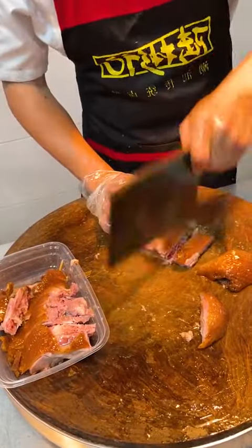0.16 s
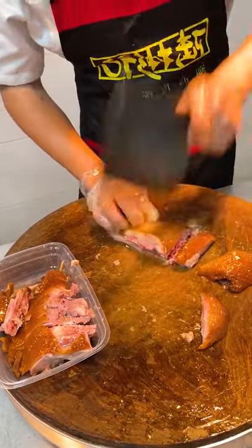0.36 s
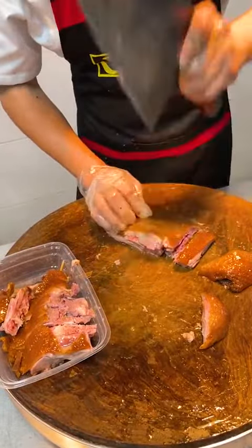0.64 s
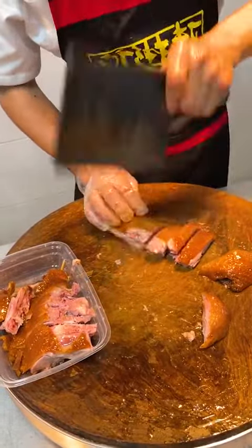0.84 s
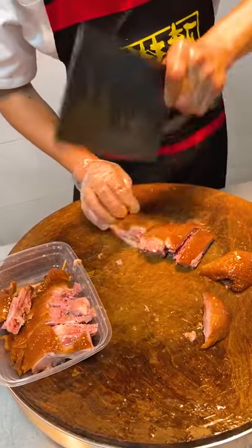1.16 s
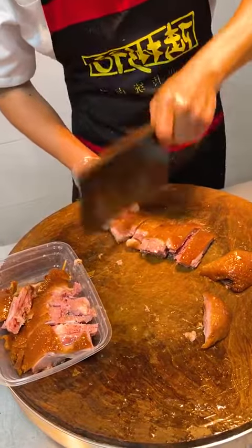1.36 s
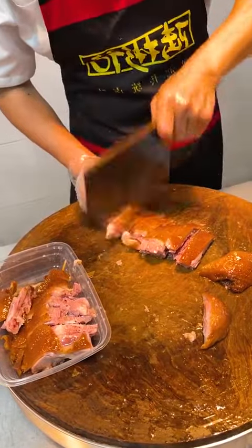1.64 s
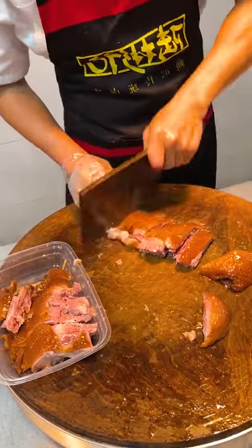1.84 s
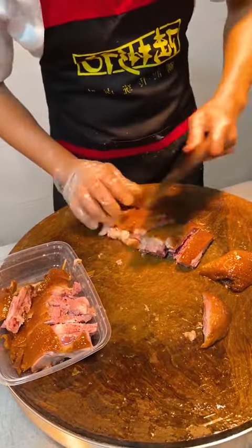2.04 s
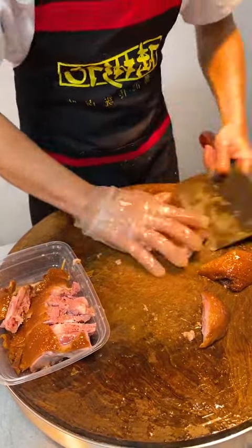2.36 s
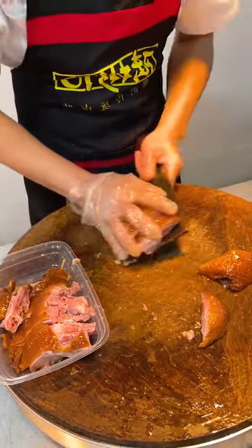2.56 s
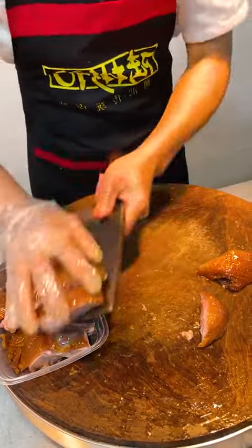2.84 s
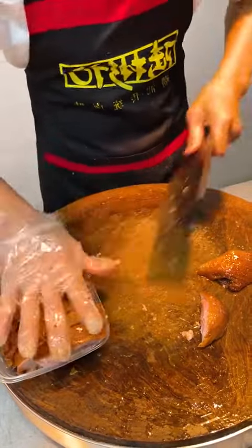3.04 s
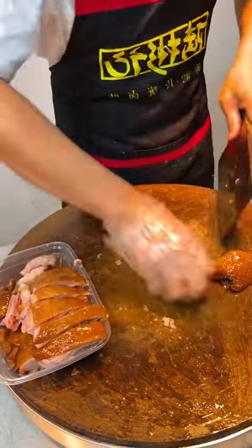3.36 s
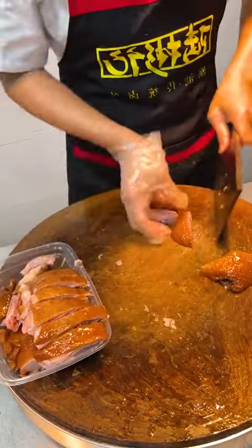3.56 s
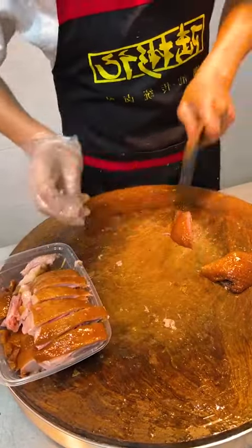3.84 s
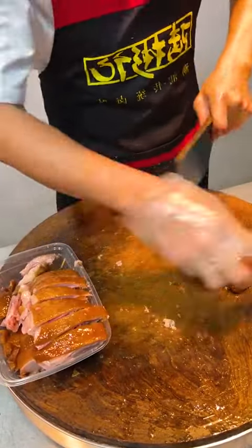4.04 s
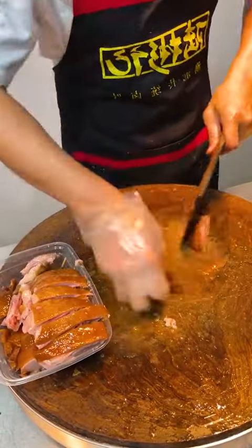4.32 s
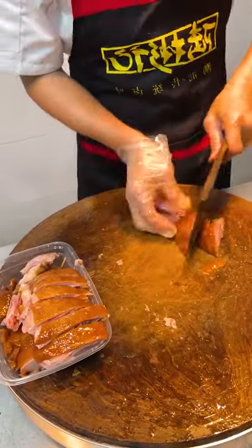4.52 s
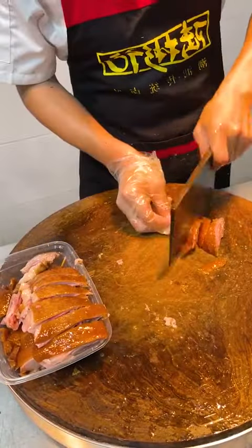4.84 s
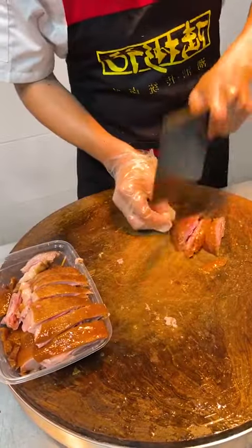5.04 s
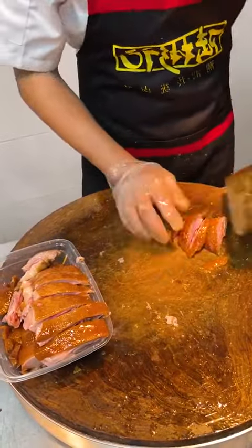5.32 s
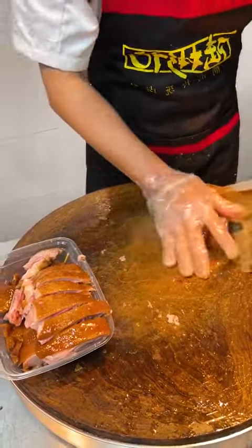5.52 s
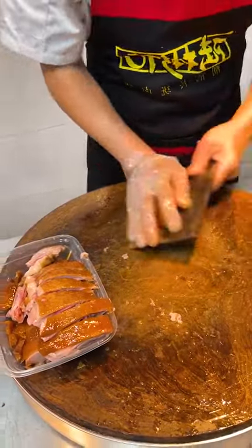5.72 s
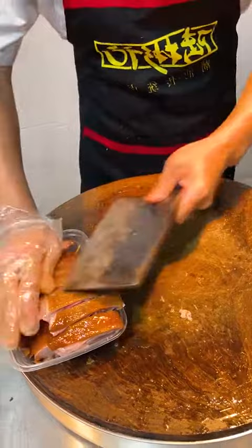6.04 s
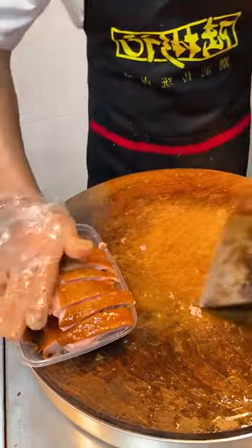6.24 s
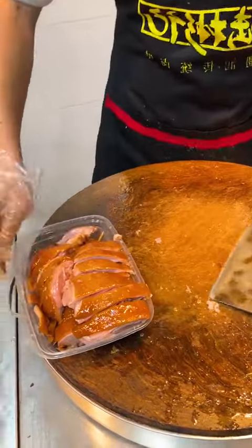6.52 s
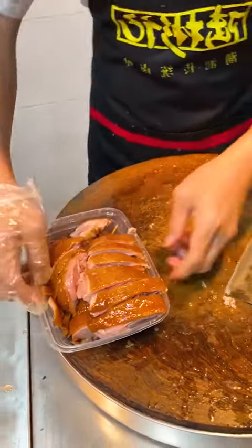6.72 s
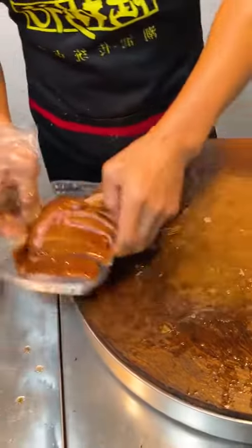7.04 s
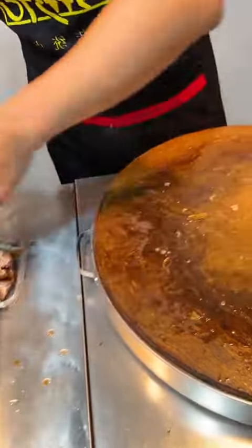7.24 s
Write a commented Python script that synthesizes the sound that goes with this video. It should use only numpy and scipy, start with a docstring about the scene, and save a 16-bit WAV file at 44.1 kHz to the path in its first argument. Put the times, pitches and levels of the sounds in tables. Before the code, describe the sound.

A heavy cleaver cracks through crisp roast meat on a thick wooden block in a small hard-walled shop, then blade, handle and plastic tub clatter lightly.

```python
"""In a small, hard-walled shop a heavy cleaver chops roast meat on a thick wooden block.
Each chop is a burst of crackling noise (skin and bone), then damped modes of block and table.
Filtered noise and steel modes make the blade scoop and lie down; a plastic glove rustles, a plastic tub is lifted.
A diffuse room rings after the blows over a steady rush of ventilation; a limiter ducks and lets the room swell back."""
import sys
import numpy as np
from scipy import signal
from scipy.fft import rfft, irfft, next_fast_len
from scipy.io import wavfile
from scipy.ndimage import uniform_filter1d, minimum_filter1d, map_coordinates

SR = 44100
rng = np.random.default_rng(int(sys.argv[2]) if len(sys.argv) > 2 else 0)


def persist_wave(psi):
    """Save psi, clipped to +-1, as 16-bit WAV."""
    counts = np.round(np.clip(psi, -1, 1) * 32767).astype(np.int16)
    wavfile.write(sys.argv[1], SR, np.atleast_2d(counts).T)


N = 325458
TIME = np.arange(N) / SR  # s
AGE = TIME[:SR // 2]  # s since the start of one short sound
# All levels in dB are relative; the functions that play them may add gains.

# Edge meets wood: start_s, level_db, pitch_factor, crunch_db (relative to the blow),
# cutting_s (time to cut through), weight_db (of the arm behind the blow)
CHOP_BLOWS = [(-.17, 0, .69, -48, .006, 2), (0.147, 26.5, 0.8, -1, 0.0085, 16),
              (0.4679, 8.5, 0.64, 13, .0058, 5.5), (0.7831, 12.5, 0.88, 10.5, .0045, 4),
              (1.0705, 13, 0.79, 8, 0.0025, -0.5), (1.343, 5.5, 0.79, 7.5, 0.001, 4),
              (1.6134, 3, 0.77, 10, 0.0017, -1.5), (1.8888, 9, 0.94, 1, 0.0004, -3),
              (3.2103, -7, 0.886, -16, 0.001, -1), (3.569, -6.5, 0.9, -25, 0.0008, 2),
              (3.9213, 7, 0.94, -16, 0.007, -1.5), (4.862, 6.5, 0.99, -14.5, .0085, 2.5),
              (5.152, 11.5, 0.89, -14, 0.0058, 0)]
# Modes of the block with the blade bitten in: pitch_hz (at pitch factor 1), level_db, t60_s
BLOCK_MODES = [(221, -9, 0.029), (406, -6.5, 0.012), (513, -28.5, 0.04), (890, -4.5, 0.013),
               (1106, -1.5, 0.018), (1422, -10, 0.02), (2200, 2, 0.0022)]
THUMP_DB, THUMP_GROWS = 4.5, 0.29  # bounce under a 0 dB blow; dB more per dB of blow
LEAD_IN_DB, LEAD_IN_HZ, LEAD_IN_S = -26.5, 1230, 0.0075  # soft noise leading into every chop


def chops():
    """Fracture noise, then modal impact: the edge crunches through skin and bone and cracks into the wood."""
    knocks, snaps = np.zeros(N), np.zeros((2, N))
    for s, db, pitch, crunch_db, cutting_s, weight_db in CHOP_BLOWS:
        knock = amp(db) * (ring(BLOCK_MODES, pitch) + sweep(pitch))
        bounce = amp(THUMP_DB + THUMP_GROWS * db + weight_db) * thump()
        add(knocks, s, knock + bounce)
        lead_in = scuff(LEAD_IN_HZ, 2 * LEAD_IN_S, skirt_db=27)
        add(snaps, s - LEAD_IN_S, amp(LEAD_IN_DB) * lead_in)
        # the crunch builds as the skin gives and lasts until the edge stops in the wood
        since = AGE - .02
        shape = np.exp(np.minimum(since, 0) / 0.0017 - np.maximum(since - cutting_s, 0) / 0.0031)
        add(snaps, s - cutting_s - .02, amp(db + crunch_db - 18) * crackle(shape, grain_db=3.5))
        # the crack into the wood is brighter for harder blows
        crack = crackle(amp(-60 * AGE / 0.011), grain_db=-17)
        add(snaps, s, amp(db - 24.5) * softened(crack, corner_hz=3400 * amp(db / 3)))
        add(snaps, s, amp(db - 40.0) * blade(linger_db=-19))
    return softened(bending(knocks), corner_hz=5500) + snaps


SWEEP_DB, SWEEP_HZ = -9.5, 1252  # level; starting pitch at pitch factor 1
SWEEP_FALL_S, SWEEP_S = 0.00748, 0.0081  # time constant of the fall; length


def sweep(pitch, rise=0.0057):
    """Falling frequency: the edge slows as it sinks in, and the knock slides down into the thud."""
    turns = SWEEP_HZ * pitch * SWEEP_FALL_S * (1 - np.exp(-AGE / SWEEP_FALL_S))
    envelope = (1 - np.exp(-AGE / rise)) * np.exp(-(AGE / SWEEP_S) ** 2)
    return amp(SWEEP_DB) * np.sin(2 * np.pi * turns) * envelope


# Modes of the block rocking on its table: pitch_hz (before a small random shift), level_db, t60_s
TABLE_MODES = [(74.3, -16, 0.14), (112.7, -21.5, 0.15), (172, -24.5, 0.15), (245, -18.5, 0.067),
               (349, -12, 0.05)]


def thump(build=0.0041):
    """Mass on a springy support: the whole block bounces on its table."""
    pitch = 1 + .035 * rng.normal()
    return ring(TABLE_MODES, pitch) * (1 - np.exp(-AGE / build))


# Spectrum of the crunch: pitch_hz, level_db
CRUNCH_COLOUR = [(200, -41), (800, 10.5), (1300, 6.5), (1900, -2.5), (2600, 8.5), (3250, 1.5), (3800, 6.5),
                 (5000, -1.5), (5650, 6.5), (6550, -3), (7000, 1.5), (7450, -16.5), (11000, -11.5),
                 (16000, -15.5)]
CRUNCH_PEAKS_DB, CRUNCH_PEAKS_HZ = 2.4, 170  # depth and spacing of the random resonances


def crackle(shape, grain_db):
    """Granular fracture: bright noise breaks into millisecond snaps, with the energy of its envelope."""
    swell = unit(uniform_filter1d(rng.standard_normal(len(AGE)), size=44))  # 1 ms
    grains = amp(grain_db * np.clip(swell, -2, 2))
    colour = lambda hz: along(CRUNCH_COLOUR, hz) + CRUNCH_PEAKS_DB * ripple(hz, CRUNCH_PEAKS_HZ)
    pair = noise(colour, len(AGE))
    narrowed = pair + .5 * pair[::-1]  # each side leaks into the other
    return unit(narrowed * grains * shape) * np.sqrt(np.mean(shape ** 2))


# Sharp cracks in the crunch or as the edge meets the wood: start_s, level_db, pitch_hz, t60_s
CRACKS = [(0.4603, 3.5, 2840, .014), (0.7795, -16, 3260, 0.0047), (1.3377, -4, 2600, 0.0035),
          (1.3442, 4.5, 1720, .009), (1.6122, 3.5, 1670, 0.0051), (1.8904, -5.5, 2330, 0.005),
          (3.9155, -20, 1370, 0.0092), (4.841, -34.5, 1340, 0.011), (4.8518, -9.5, 3920, 0.0018),
          (4.8557, -19, 1100, 0.013), (4.8582, -7, 5700, 0.0096), (4.8622, 0, 1700, 0.0061),
          (5.1455, -23, 3800, 0.0035)]


def sharp_cracks():
    """Damped oscillation: a short tone and a crackle make single cracks that stand out of the chops."""
    out = np.zeros((2, N))
    for s, db, hz, t60 in CRACKS:
        rough = crackle(amp(-60 * AGE / t60), grain_db=1.5)
        add(out, s, amp(db) * (ring([(hz, 0, t60)]) + amp(-5.5) * rough))
    return out


# After a chop with little meat under it the block knocks its table again: start_s, level_db
AFTER_KNOCKS = [(3.237, -23), (3.261, -21.5), (3.588, -16), (3.600, -14.5), (3.621, -19)]
# Modes of that knock: pitch_hz, level_db, t60_s
AFTER_KNOCK_MODES = [(104, -5, 0.061), (213, -1, 0.022), (370, -1.5, 0.028)]


def rebounds():
    """Repeated impact: the rocking block gives dull after-knocks, each a few damped low modes."""
    out = np.zeros(N)
    for s, db in AFTER_KNOCKS:
        add(out, s, amp(db) * ring(AFTER_KNOCK_MODES))
    return out


# Strongest rings of the blade on block or tub; one landing may take several rows:
# start_s, level_db, pitch_hz (most excited), thump_db, free_ring_db (low when hand or meat damps it)
BLADE_CLANKS = [(2.322, -30.5, 3480, 0.5, 3.5), (2.977, -29.5, 5560, -23, -12),
                (3.008, -37, 4500, -24, -12), (3.212, -20.5, 2320, 1, 4.5), (5.490, -14, 975, -3, -7),
                (5.493, -19.5, 2370, -6, -8), (5.495, -25.5, 3500, -14, 0.5), (6.329, -15, 2070, -0.5, 1),
                (6.336, -25, 2520, 0.5, -15), (6.399, -41, 2126, 8, -4)]
# soft noise leading into each clank: level relative to the clank; how long before
CLANK_LEAD_IN_DB, CLANK_LEAD_IN_S = -18, 0.01


def clanks():
    """Coupled impact: the slapped or laid-down blade excites its own modes and those of the block."""
    steel, wood = np.zeros((2, N)), np.zeros(N)
    for s, db, lead_hz, thump_db, free_db in BLADE_CLANKS:
        crack = softened(crackle(amp(-60 * AGE / 0.029), grain_db=-9.5), corner_hz=3 * lead_hz)
        lead_in = scuff(lead_hz, 2 * CLANK_LEAD_IN_S)
        add(steel, s - CLANK_LEAD_IN_S, amp(db + CLANK_LEAD_IN_DB) * lead_in)
        add(steel, s, amp(db) * (amp(-3.0) * blade(lead_hz, free_db) + amp(-11.0) * crack))
        knock = amp(-1) * ring(BLOCK_MODES, pitch=0.85)
        add(wood, s, amp(db) * (knock + amp(thump_db + 10.0) * thump()))
    return steel + bending(wood)


# Modes of the blade: pitch_hz, level_db, t60_s (against the wood), free_ring_db (relative to level_db)
STEEL_MODES = [(972, 6.5, 0.039, -42), (1500, 2.5, .018, -29), (1800, -8, 0.02, -40), (2115, 5, 0.063, -32),
               (2225, -1, .04, -39), (2515, 6, 0.028, -38), (2830, -8, 0.029, -41), (3473, 0.5, 0.079, -22),
               (3730, -2.5, 0.034, -27), (5230, -23, .05, -32), (5550, -1.5, 0.026, -29),
               (5900, -18, .05, -21), (6400, -15, 0.038, -32)]
FREE_T60_S, FREE_HZ, FREE_SLOPE = 1.5, 2150, 0.48  # free decay at this pitch; higher modes die sooner
FOCUS_OCTAVES = 0.22  # how closely a contact picks out one mode
DULL_DB_PER_OCTAVE = 1.5  # loss of the modes above it


def blade(lead_hz=None, linger_db=0, focus_db=14):
    """Selective modal excitation: steel rings most near lead_hz, briefly on wood, then faintly and freely."""
    modes = []
    for hz, db, t60, free_db in STEEL_MODES:
        octaves = np.log2(hz / lead_hz) if lead_hz else 0  # a blow on the edge wakes all modes alike
        away_db = focus_db * np.tanh(abs(octaves / FOCUS_OCTAVES)) + DULL_DB_PER_OCTAVE * max(octaves, 0)
        modes.append((hz, db - away_db, t60, free_db))
    pressed = ring([mode[:3] for mode in modes])
    free_modes = []
    for hz, db, _, free_db in modes:
        free_t60 = FREE_T60_S * (FREE_HZ / hz) ** FREE_SLOPE
        free_modes.append((hz, db + free_db + linger_db, free_t60))
    return pressed + wavering(ring(free_modes))


# The handle drops on the block and bounces: start_s, level_db, thump_db
HANDLE_FALLS = [(6.6094, -14, -7.5), (6.644, -36.5, 5.5)]
# Modes of the cleaver struck at its handle: pitch_hz, level_db, t60_s
HANDLE_MODES = [(867, -13, 0.11), (1370, 3, 0.017), (1600, 8.5, 0.019), (1695, -4, 0.013),
                (2090, -8, 0.015), (2550, -5, 0.027), (3070, -6.5, 0.018), (3380, -10, 0.034),
                (3810, -8, 0.03), (4400, -16, 0.02), (5300, -23, 0.018), (6000, -19, 0.031)]
# Modes that ring on as it lies there: pitch_hz, level_db, t60_s
HANDLE_TAIL_MODES = [(890, -39, 0.33), (1560, -23, 0.4), (1600, -27, 0.34), (2520, -33, 0.62),
                     (3330, -39, 0.8)]


def handle_drops():
    """Impact at another point: a blow on the handle excites other modes of the cleaver and the block."""
    steel, wood = np.zeros((2, N)), np.zeros(N)
    for s, db, thump_db in HANDLE_FALLS:
        crack = softened(crackle(amp(-60 * AGE / 0.022), grain_db=5.0), corner_hz=4200)
        lead_in = scuff(1740, 2 * CLANK_LEAD_IN_S)
        add(steel, s - CLANK_LEAD_IN_S, amp(db + CLANK_LEAD_IN_DB) * lead_in)
        tail = wavering(ring(HANDLE_TAIL_MODES))
        add(steel, s, amp(db) * (ring(HANDLE_MODES) + tail + amp(-8) * crack))
        knock = amp(-10) * ring(BLOCK_MODES, pitch=0.67)
        add(wood, s, amp(db) * (knock + amp(thump_db + 15.5) * thump()))
    return steel + bending(wood)


# Meat set down on the block: start_s, level_db
MEAT_THUDS = [(4.32, -16), (4.462, -12)]


def thuds():
    """Soft impact: yielding meat acts as a low-pass on the bounce of the block."""
    out = np.zeros(N)
    for s, db in MEAT_THUDS:
        add(out, s, amp(db) * filtered(thump(build=0.0037), lambda hz: 1 / (1 + 1j * hz / 110)))
    return bending(out)


# The blade slides over block or tub rim: start_s, level_db, length_s, pitch_hz (most excited),
# ring_db (steel relative to grit)
BLADE_SCRAPES = [(2.481, -44, 0.12, 2126, -3), (2.54, -45.5, 0.097, 1433, -18),
                 (2.888, -50, 0.46, 3480, -5), (2.965, -40, 0.037, 5560, 5),
                 (3.001, -32.5, 0.018, 5560, -11), (5.57, -43, 0.042, 5080, 4),
                 (5.59, -40, 0.024, 3480, -1), (5.644, -41.5, 0.082, 5610, -5), (5.668, -40, 0.02, 2126, 1)]
GRIT_HZ, GRIT_DB, SLIPS_PER_S = 1770, 0.5, 700  # centre of the grit; gain of a scrape; mean slip rate


def scrapes():
    """Stick-slip friction: the blade scrapes as it scoops and slides."""
    out = np.zeros((2, N))
    for s, db, length, lead_hz, ring_db in BLADE_SCRAPES:
        add(out, s, amp(db) * scrape(length, lead_hz, ring_db))
    return out


def scrape(length, lead_hz, ring_db):
    """Convolution of random slips with a response: every slip is a grain of grit and rings the steel."""
    slipping = rng.random(len(AGE)) < SLIPS_PER_S / SR
    slips = slipping * rng.uniform(-0.51, 1, len(AGE)) * stroke(length)
    struck = lambda response: unit(signal.fftconvolve(slips[None], response, axes=1)[:, :len(AGE)])
    grit = struck(scuff(GRIT_HZ, length=0.0073, skirt_db=9))
    steel = struck(blade(lead_hz, linger_db=-8))
    level = np.sqrt(np.mean(stroke(length) ** 2)) * amp(GRIT_DB)
    return level * (grit + amp(ring_db) * steel)


# The plastic tub is nudged, gripped and lifted: start_s, level_db, pitch_hz
TUB_TOUCHES = [(6.079, -34.5, 1370), (6.1814, -32, 1840), (6.199, -36, 1640), (6.816, -39, 1220),
               (6.839, -32.5, 1630), (6.958, -33, 1490), (6.979, -29, 2250), (6.984, -32, 1150),
               (7.049, -41, 1040), (7.101, -39, 2250), (7.334, -38, 1080)]
TUB_T60_S, TUB_RUB_S = 0.016, 0.0056  # decay of the wall's own note; length of the rub
TICK_DB, TICK_S = -13.5, 0.0013  # the dry click that starts a tap
FLEX_DB, FLEX_HZ, FLEX_S = -17, 2500, 0.075  # noise of the thin wall that goes on after it


def tub_taps():
    """Thin-shell vibration: each tap sounds a damped note of the wall with a click, a rub and flexing."""
    out = np.zeros((2, N))
    for s, db, hz in TUB_TOUCHES:
        note = ring([(hz, 0, TUB_T60_S)]) * (1 - np.exp(-AGE * hz))
        rub = scuff(hz, TUB_RUB_S, skirt_db=13)
        tick = amp(TICK_DB) * scuff(2 * hz, TICK_S, skirt_db=-7)
        flex = amp(FLEX_DB) * scuff(FLEX_HZ, FLEX_S)
        add(out, s, amp(db - 3) * (note + rub + tick + flex))
    return out


# Greasy meat sticks to blade or glove and lets go: start_s, level_db
MEAT_SMACKS = [(2.32, -35.5), (2.968, -42), (2.996, -40.5), (4.318, -48.5), (4.529, -54), (4.752, -58),
               (5.59, -44)]


def smacks():
    """Adhesive release: wet meat lets go with a short burst of bright noise."""
    out = np.zeros((2, N))
    for s, db in MEAT_SMACKS:
        add(out, s, amp(db) * scuff(5630, length=0.021))
    return out


# The gloved hand grips, pushes or reaches: middle_s, level_db, length_s
GLOVE_MOVES = [(-0.004, -48, 0.3), (0.35, -80, 0.63), (0.596, -47, 0.098), (1.05, -67, 0.9),
               (1.523, -65, 1), (2.477, -65.5, 0.28), (3.094, -75, 0.48), (3.502, -69, 0.23),
               (4.1, -101, 0.35), (4.545, -75, 0.57), (5.307, -91, 0.26), (5.655, -63, 0.23),
               (6.16, -66, 0.23), (6.405, -70, 0.17), (6.743, -73, 0.22), (6.953, -74.5, 0.19)]
# Spectrum of the rustling plastic: pitch_hz, level_db
GLOVE_COLOUR = [(900, -67), (2300, 4.5), (3500, 3.5), (5000, -1.5), (6700, 1), (8300, -24.5), (10500, -8.5),
                (15000, -21.5)]
RESTING_DB = -77  # rustle between moves, on the same scale as the moves


def glove():
    """Amplitude-modulated noise: thin plastic crinkles, swelling and fading with each move of the hand."""
    motion = amp(RESTING_DB)
    for s, db, length in GLOVE_MOVES:
        motion = motion + amp(db) * np.exp(-(2 * (TIME - s) / length) ** 2)
    crinkle = amp(2 * unit(uniform_filter1d(rng.standard_normal(N), size=130)))  # 3 ms
    return amp(11.5) * motion * unit(noise(lambda hz: along(GLOVE_COLOUR, hz), N) * crinkle)


EARLY_DB, EARLY_T60_S, EARLY_LOW_HZ = -16, 0.25, 1230  # level, decay and lower edge


def near_walls(x, gap=0.0023):
    """Early reflection by convolution: a short, dense answer keeps the colour of whatever was struck."""
    colour = lambda hz: -10 * np.log10(1 + (EARLY_LOW_HZ / (hz + 1)) ** 6) - hz / 1300
    tail = noise(colour, len(AGE))
    tail = tail * amp(-60 * AGE / EARLY_T60_S) * (1 - np.exp(-AGE / gap)) ** 2
    return amp(EARLY_DB) * signal.fftconvolve(x, tail / np.linalg.norm(tail[0]) / 2, axes=1)[:, :N]


ROOM_DB, ROOM_GROWS = 2.5, 0.85  # answer to a 0 dB blow; dB more per dB of blow
ROOM_PER_WEIGHT = 0.35  # dB more per dB of arm weight
TREBLE_DB, TREBLE_GROWS = 4, 0.29  # its treble at 0 dB of crunch; dB more per dB of crunch
CLANK_ROOM_DB, CLANK_TREBLE_DB = 7, 8.5  # answer relative to a clank's thump, and its treble


def room_blows():
    """Source strength: heavier blows feed the room more, as (start_s, level_db, treble_db)."""
    blows = []
    for s, db, _, crunch_db, _, weight_db in CHOP_BLOWS:
        level_db = ROOM_DB + ROOM_GROWS * db + ROOM_PER_WEIGHT * weight_db
        blows.append((s, level_db, TREBLE_DB + TREBLE_GROWS * crunch_db))
    landings = [(s, db, thump_db) for s, db, _, thump_db, _ in BLADE_CLANKS] + HANDLE_FALLS
    for s, db, thump_db in landings:
        blows.append((s, db + thump_db + CLANK_ROOM_DB, CLANK_TREBLE_DB))
    return blows


# Colour of the room: pitch_hz, level_db
WALL_COLOUR = [(24, -38), (40, -8), (108, 5), (270, -3.5), (454, -1), (541, -2.5), (700, -5), (970, -5),
               (1120, -14.5), (1500, -26), (1900, -27.5), (2220, -20.5), (5850, -36), (7310, -47.5),
               (8270, -83), (10300, -51.5), (15000, -63)]
# Standing waves between the walls: pitch_hz, width_hz, level_db
STANDING_WAVES = [(113, 20, 4), (179, 12, 6.5), (411, 8.3, 3.5), (441, 5.5, -1.5), (475, 32, 2),
                  (558, 25, -1), (662, 10.5, 8), (728, 35, -1.5), (787, 42, 5.5)]
# Random unevenness of the room's colour: pitch_hz, depth_db
RIPPLE_DEPTH = [(1000, .8), (2500, 1.4), (5000, 2)]
# Reverberation time: pitch_hz, t60_s
ROOM_DECAY = [(80, 0.32), (400, 1.12), (900, 0.97), (3000, 1.347), (10000, 1.55)]


def room(build=0.00066):
    """Reverberant decay: every blow fills the shop with diffuse noise that dies away band by band."""
    standing = lambda f: sum(db / (1 + (2 * (f - centre) / width) ** 2)
                             for centre, width, db in STANDING_WAVES)
    colour = lambda f: along(WALL_COLOUR, f) + standing(f) + along(RIPPLE_DEPTH, f) * ripple(f)
    hz, t, z = signal.stft(noise(colour, N), SR, nperseg=256)
    t60 = along(ROOM_DECAY, hz)[:, None]
    treble = along([(900, 0.073), (2500, 0.57)], hz)[:, None]  # share of treble_db in each band
    power = 0
    for s, db, treble_db in room_blows():
        age = np.maximum(t - s, 0)
        decay = amp(db + treble_db * treble - 60 * age / t60)
        power = power + (decay * (1 - np.exp(-age / build))) ** 2
    # the ring flickers in broad patches of pitch, alike in both sides
    patches = uniform_filter1d(rng.standard_normal(z.shape), size=4, axis=0)
    patches = unit(uniform_filter1d(patches, size=22, axis=1))
    return signal.istft(z * amp(1.2 * patches) * np.sqrt(power), SR, nperseg=256)[1][:, :N]


# Spectrum of the fans: pitch_hz, level_db
FAN_COLOUR = [(25, -15), (60, -4), (110, 1.5), (170, -1.5), (270, -9.5), (480, -11.5), (800, -19),
              (1400, -27), (3000, -32.5), (7000, -65), (15000, -46)]


def ventilation():
    """Stationary broadband noise: a steady low rush of fans."""
    return amp(-47.5) * noise(lambda hz: along(FAN_COLOUR, hz), N)


# Coherence of diffuse sound: pitch_hz, likeness (left-right correlation)
COHERENCE = [(100, 1), (300, 1), (430, 0.95), (620, 0.65), (950, 0.76), (1300, 0.78), (1900, 1),
             (2700, 0.53), (6000, 0.37), (12000, 0.82)]


def noise(colour_db, size):
    """Partial coherence: diffuse stereo noise of rms 1, its colour a function of frequency."""
    turn = lambda hz: np.arccos(np.clip(along(COHERENCE, hz), -1, 1)) / 2
    response = lambda hz: amp(colour_db(hz)) * [np.cos(turn(hz)), np.sin(turn(hz))]
    mid, side = filtered(rng.standard_normal((2, size)), response)
    return unit(np.array([mid + side, mid - side]))


def ring(modes, pitch=1):
    """Modal superposition: damped sines, at slightly new strengths for every blow."""
    out = 0
    for k, (hz, db, t60) in enumerate(modes):
        decay = amp(db + .5 * rng.normal() - 60 * AGE / t60)
        out = out + decay * np.sin(2 * np.pi * hz * pitch * AGE) * (-1) ** k
    return out


def bending(x, cycles=1.266, stiff_hz=560):
    """Dispersion: low bending waves travel slowly, so a knock sweeps downwards."""
    return filtered(x, lambda hz: np.exp(-2j * np.pi * cycles * np.log((hz + 20) / (hz + stiff_hz))))


def softened(x, corner_hz):
    """Contact time as a low-pass: a slower contact keeps less treble."""
    return filtered(x, lambda hz: 1 / np.sqrt(1 + (hz / corner_hz) ** 4))


def scuff(centre_hz, length, skirt_db=14):
    """Friction noise: a short rub, its band sloping by skirt_db per octave on both sides."""
    return stroke(length) * noise(lambda hz: -skirt_db * abs(np.log2((hz + 1) / centre_hz)), len(AGE))


def stroke(length):
    """Friction envelope: a rub catches quickly, then slides out."""
    return (1 - np.exp(-10 * AGE / length)) * np.exp(-2 * AGE / length)


def wavering(x, depth=0.71, rate_hz=25):
    """Random amplitude modulation: a lingering ring swells and dips unevenly."""
    return x * (1 + depth * noise(lambda hz: -6 * hz / rate_hz, len(AGE)))


def ripple(hz, spacing_hz=60):
    """Spectral unevenness: random peaks and dips along frequency, for the caller to scale."""
    return map_coordinates(rng.standard_normal(1024), [hz / spacing_hz], mode="mirror")


def amp(db):
    """Level law: decibels to gain."""
    return 10 ** (np.asarray(db) / 20)


def unit(x):
    """Energy normalisation: scaled to rms 1."""
    return x / np.sqrt(np.mean(x ** 2) + 1e-20)


def along(points, hz):
    """Logarithmic pitch scale: (Hz, value) points interpolated on a log axis."""
    f, v = np.transpose(points)
    return np.interp(np.log(hz + 1), np.log(f + 1), v)


def filtered(x, response):
    """Linear filtering: the spectrum of x times a complex response of frequency."""
    n = x.shape[-1]
    m = next_fast_len(n + SR // 4)
    return irfft(rfft(x, m) * response(np.fft.rfftfreq(m, 1 / SR)), m)[..., :n]


def add(track, s, sound):
    """Superposition: mix a sound in at time s, cut to the track."""
    start = round(s * SR)
    lo, hi = max(start, 0), min(start + sound.shape[-1], N)
    track[..., lo:hi] += sound[..., lo - start:hi - start]


def scene():
    """Direct sound, reflections and background: the work at the block, its room and the fans."""
    handling = scrapes() + tub_taps() + smacks()
    work = chops() + sharp_cracks() + rebounds() + clanks() + handle_drops() + thuds() + amp(1.5) * handling
    return work + near_walls(work) + glove() + amp(-24.0) * room() + ventilation()


def limiter(x, ceiling_db=-15.0, creep_db=56, release_db=210, hold=0.11):
    """Gain reduction: loud blows duck the gain; it creeps up in the hold, then recovers fast (dB/s)."""
    power = abs(uniform_filter1d(np.mean(x ** 2, 0), size=440))  # 10 ms
    excess = np.maximum(10 * np.log10(power + 1e-12) - ceiling_db, 0)
    span = 2 * int(hold * SR / 2) + 1
    held = -minimum_filter1d(-excess, span, origin=span // 2)
    recover = lambda cut, rate: np.maximum.accumulate(cut + rate * TIME) - rate * TIME
    cut_db = np.minimum(recover(excess, creep_db), recover(held, release_db))
    return x * amp(-uniform_filter1d(cut_db, size=130))


MONO_BELOW_HZ, WIDE_ABOVE_HZ, WIDE_TURN = 215, 12000, .5  # bass edge, treble edge, largest turn in radians


def stereo_image(x):
    """Interchannel phase: one centred bass, and a highest treble whose two sides turn apart."""
    mid, side = (x[0] + x[1]) / 2, (x[0] - x[1]) / 2
    turn = lambda hz: WIDE_TURN * (hz > WIDE_ABOVE_HZ) * np.sin(2 * np.pi * hz / 690)
    side = filtered(side, lambda hz: 1 - 1 / (1 + (hz / MONO_BELOW_HZ) ** 10))
    side = side + filtered(mid, lambda hz: 1j * np.tan(turn(hz)))
    return np.array([mid + side, mid - side])


def record(dry, low_hz=41):
    """Transducer chain of a phone: bass roll-off, limiter, rounded peaks, stereo image, band limit."""
    x = limiter(filtered(dry, lambda hz: (1j * hz / (low_hz + 1j * hz)) ** 2))
    x = x / (1 + (x / .9) ** 6) ** (1 / 6)
    return filtered(stereo_image(x), lambda hz: hz < 15900)


dry = scene()
out = record(dry)
persist_wave(out)
```